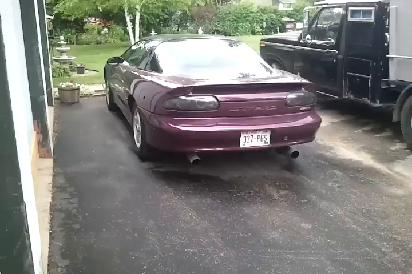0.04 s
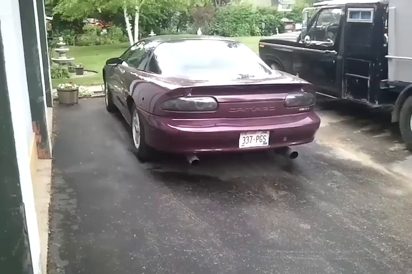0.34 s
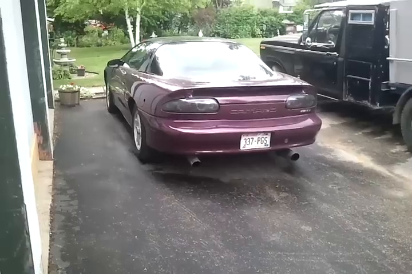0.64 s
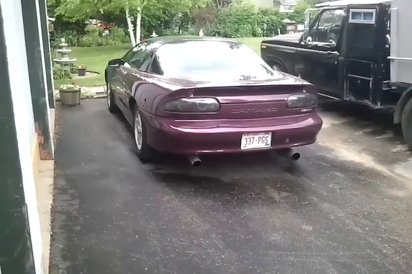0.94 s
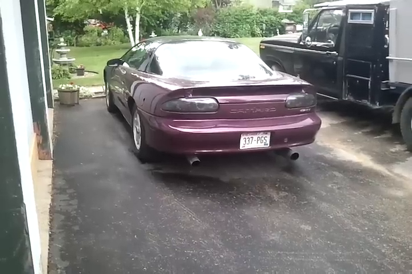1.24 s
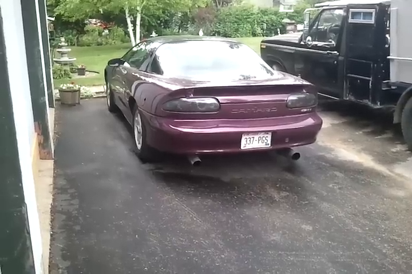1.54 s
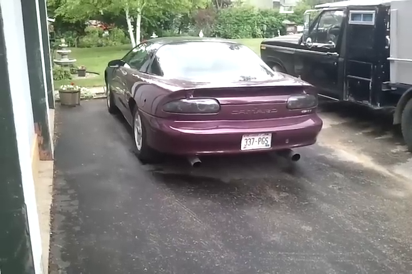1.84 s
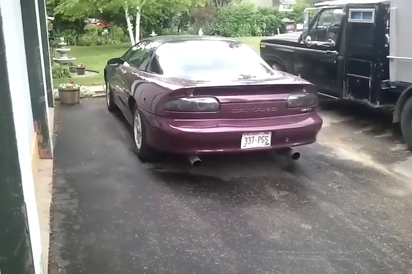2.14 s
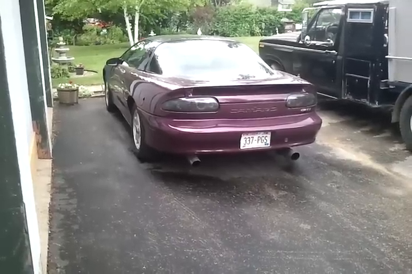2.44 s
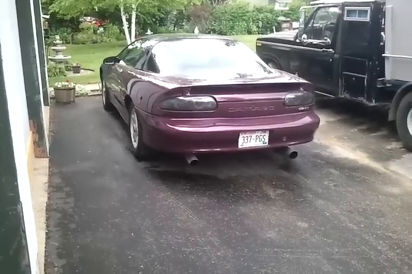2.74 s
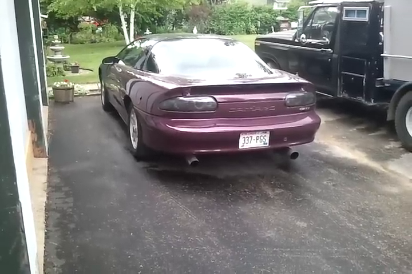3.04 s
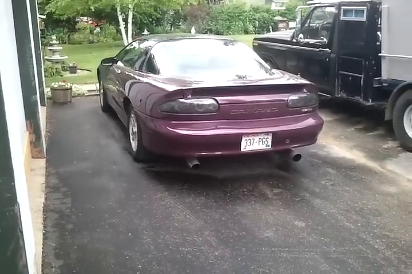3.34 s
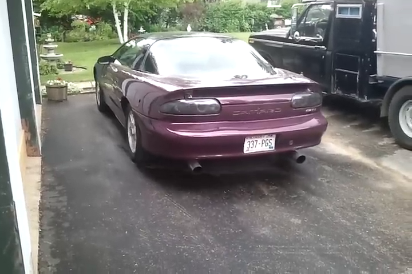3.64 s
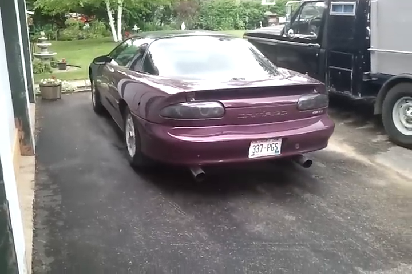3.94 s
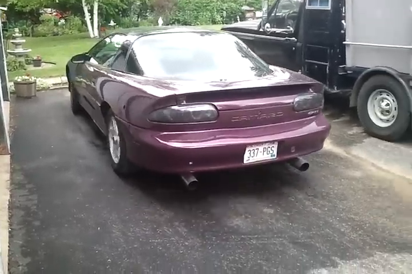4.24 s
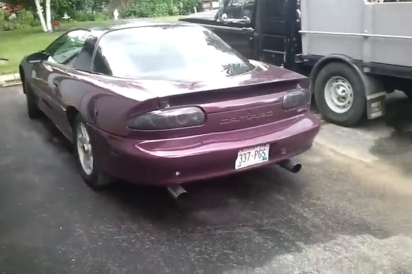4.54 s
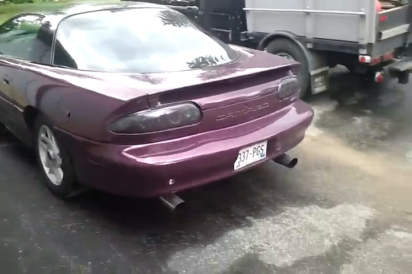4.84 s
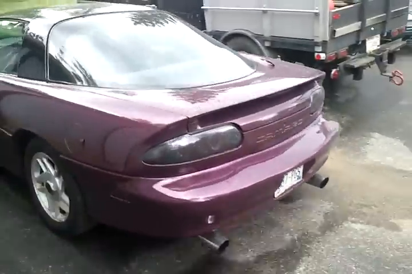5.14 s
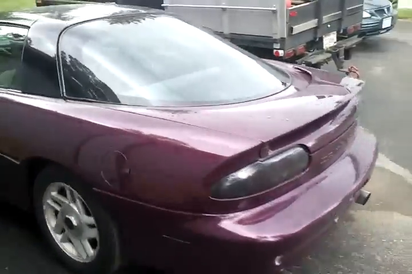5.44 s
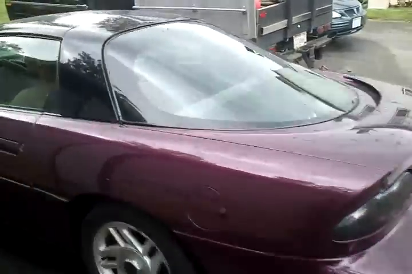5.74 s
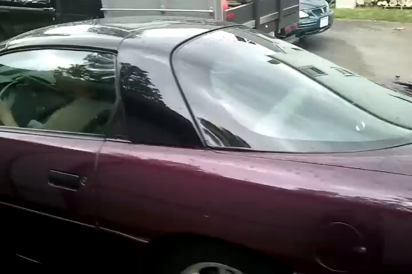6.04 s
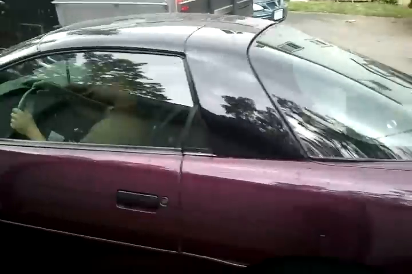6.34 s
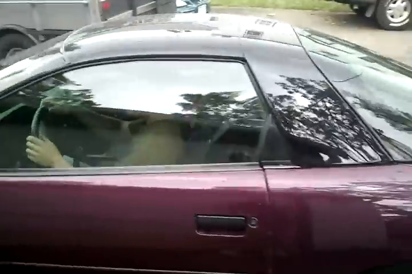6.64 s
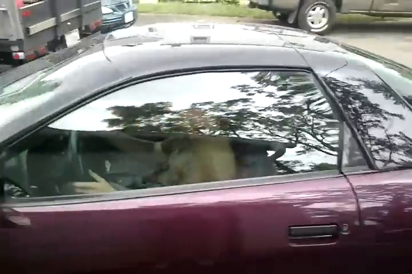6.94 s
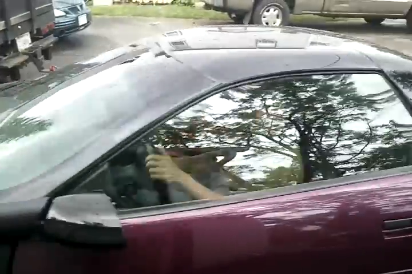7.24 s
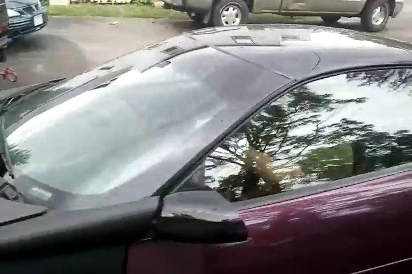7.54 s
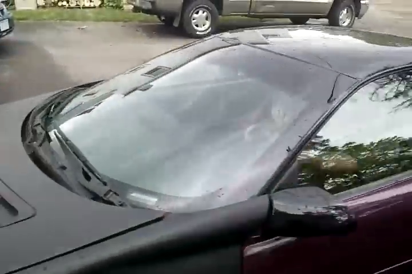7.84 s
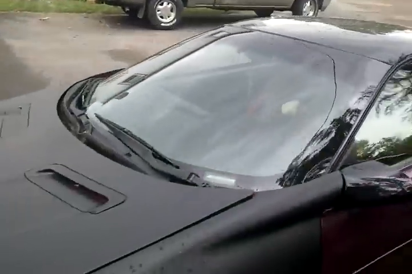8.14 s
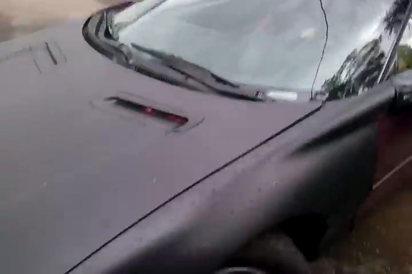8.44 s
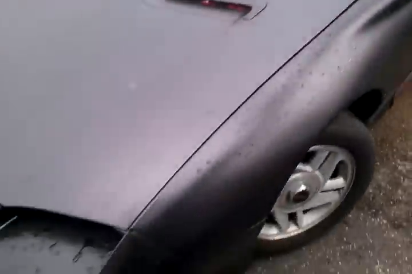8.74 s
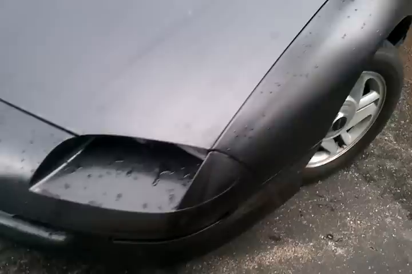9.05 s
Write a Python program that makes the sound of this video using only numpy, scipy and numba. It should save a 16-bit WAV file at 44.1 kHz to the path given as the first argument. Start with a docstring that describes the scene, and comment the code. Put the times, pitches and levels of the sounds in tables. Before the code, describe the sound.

Deep, uneven car exhaust idling, barking through three quick revs and a longer one, then settling as valve ticks and faint belt chirps emerge.

```python
"""A V8 coupe's loud exhaust lopes at idle in a driveway, heard from behind, then is revved four times.
Uneven firings boom in the mufflers, ring the pipes and shake a heat shield; each trails a puff of hiss.
The revs bark from the tailpipes and overload a small microphone.
The listener then walks past knocks and a clinking bracket to the bonnet,
where block growl, valve clatter and the hiss and chirps of the belt take over."""
import sys
import numpy as np
from scipy import signal
from scipy.fft import rfft, irfft
from scipy.io import wavfile
from scipy.ndimage import uniform_filter1d
from numba import njit

SR = 44100
rng = np.random.default_rng(int(sys.argv[2]) if len(sys.argv) > 2 else 0)


def inscribe(sig):
    """Save sig as 16-bit PCM at rate SR to the path in sys.argv[1].

    A 1-D sig is mono; a 2-D sig holds one channel per row.
    Samples are clipped to [-1, 1] before scaling.
    """
    pcm = np.round(np.clip(np.atleast_2d(sig).T, -1, 1) * 32767)
    wavfile.write(sys.argv[1], SR, pcm.astype(np.int16))


N = 410571
TIME = np.arange(N) / SR
FREQ = np.fft.rfftfreq(N, 1 / SR) + 1e-3
IDLE_HZ, IDLE_THROTTLE = 71.02, 0.17  # firing rate; opening, 0-1


# cylinders in firing order: strength_db, pipe_lag_ms
CYLINDERS = [(1, 2.3), (2, 3.3), (-0.5, 3.7), (-5.5, 0.72), (1, 2.9), (-4.5, 1.58), (1, 0.63), (-2.5, 4.2)]

def firings(hz, throttle, chug_db=1.5):
    """One pulse per cylinder in turn; the banks arrive unevenly and combustion is ragged at idle."""
    phase = np.cumsum(hz) / SR
    index = np.arange(int(phase[-1]))
    times = np.interp(index, phase, TIME)
    strength_db, lag_ms = np.array(CYLINDERS)[index % len(CYLINDERS)].T
    level_draw, time_draw = rng.standard_normal((len(index), 2)).T
    ragged = np.interp(times, TIME, idling(hz, throttle))
    scatter_db = np.interp(ragged, [0, 1], [1.6, 3.5]) * level_draw
    jitter_ms = np.interp(ragged, [0, 1], [0.2, 1.3]) * time_draw
    lope_db = chug_db * ragged * np.interp(times, TIME, wander(17))
    return clicks(times + (lag_ms + jitter_ms) / 1000, undb(strength_db + lope_db + scatter_db))


# accelerator presses: start_s, hold_s, depth, release_s
PRESSES = [(1.24, 0.09, 0.66, 0.13), (1.561, 0.072, 0.15, 0.11), (2.239, 0.17, 0.68, 0.1),
           (2.919, 0.12, 0.89, 0.13), (3.618, 0.8, 0.69, 0.28)]

def pedal(attack_s=0.076):
    """Each press opens the throttle quickly, holds it and lets it sink back to idle."""
    opening = np.zeros(N)
    for start, hold, depth, release in PRESSES:
        rise = np.clip((TIME - start) / attack_s, 0, 1)
        fall = np.exp(-np.maximum(TIME - start - hold, 0) / release)
        opening = np.maximum(opening, depth * rise * fall)
    return IDLE_THROTTLE + (1 - IDLE_THROTTLE) * opening


def idling(hz, throttle):
    """1 at idle speed and throttle, 0 once the engine runs smoothly."""
    return np.clip(1 - np.maximum(hz - IDLE_HZ, 0) / 10 - (throttle - IDLE_THROTTLE) / 0.2, 0, 1)


def pull(hz, lag_s=0.12, full_hz_per_s=130):
    """Engine load, 0-1: it pulls while the crank gains speed."""
    rise_hz_per_s = np.maximum(np.gradient(hz) * SR, 0)
    return np.tanh(fade(rise_hz_per_s, lag_s) / (lag_s * SR) / full_hz_per_s)


# pipe resonances under load: pitch_hz, width_hz, gain_db
GROWL_MODES = [(244, 20, -7), (278, 28, 11), (325, 15, 0.5)]
# exhaust level along the walk: time_s, rumble_db, drone_db
EXHAUST_LEVELS = [(0, -15, -12.5), (4.4, -8.5, -12.5), (4.85, -10, -13), (5.3, -13, -19.5),
                  (6.6, -13, -16.5), (7.6, -15, -21), (9.3, -13, -16.5)]

def exhaust(pulses, hz, throttle):
    """Firings and their turbulence flow through mufflers and pipes, which growl as the throttle opens."""
    rumble_db, drone_db = curves(EXHAUST_LEVELS)
    turbulence = unit(fade(pulses, 0.015) * noise())
    flow = unit(pulses) + (0.22 + 0.3 * idling(hz, throttle)) * turbulence
    growl = even(band(ring(flow, GROWL_MODES), 250, 360)) * (throttle - IDLE_THROTTLE) * undb(-13.5)
    mufflers = rumble(flow, hz, throttle) * undb(rumble_db)
    pipes = drone(flow, hz, throttle) * undb(drone_db)
    return mufflers + pipes + growl + chugs()


# muffler resonances: pitch_hz, width_hz, level_db
MUFFLER_MODES = [(46, 15.3, 1), (68.66, 15, -2)]

def rumble(flow, hz, throttle, lope_db=2):
    """The mufflers boom in turns, less when revved; the firing note fades as it leaves their resonance."""
    revving = uniform_filter1d(1 - idling(hz, throttle), size=4000)
    boom = np.zeros(N)
    for pitch, width, db in MUFFLER_MODES:
        mode = band(ring(flow, [(pitch, width, 0)]), 30, 98.3, order=3)
        boom += even(mode, size=6500) * undb(db + lope_db * wander(9))
    note = unit(np.sin(2 * np.pi * np.cumsum(hz) / SR + 0.66 * wander(12)))
    note_db = -7 - 0.11 * np.maximum(hz - IDLE_HZ, 0) + 2.5 * wander(8)
    return boom * undb(-1.5 - 2.5 * revving) + note * undb(note_db)


# pipe resonances: base_hz, width_hz, gain_db
PIPE_MODES = [(129.6, 30.3, -2), (156.1, 20.3, 5), (254.8, 64.7, -9.5), (311.9, 42.3, -13)]
# resonances under the floor pan: pitch_hz, width_hz, gain_db
UNDERBODY_MODES = [(126.4, 15, 2), (156.7, 49, -2), (220.2, 15.4, -5), (326.6, 21, -3.5)]

def drone(flow, hz, throttle, heat_s=0.59, waver_db=2):
    """Pipes drone louder and broader with flow, higher with heat and revs; alongside, the floor rings."""
    opening = throttle - IDLE_THROTTLE
    swell = np.tanh(np.maximum(hz - IDLE_HZ, 0) / 10 + opening / 0.52)
    heat = fade(opening, heat_s) / (heat_s * SR)
    tuning = (1 + 0.12 * heat) * (0.985 + 0.0014 * (hz - IDLE_HZ) + 0.02 * wander(8))
    damping = 0.9 + 0.15 * opening
    pipes = np.zeros(N)
    for base, width, db in PIPE_MODES:  # the pipes before and after the muffler ring alike
        front_pipe = resonate(flow, base * tuning, width * damping)
        pipes += undb(db) * resonate(front_pipe, base * tuning, width * damping)
    pipes = even(pipes, size=3200) * undb(8 * swell + 6 * throttle)
    floor = even(band(ring(flow, UNDERBODY_MODES), 86, 352), size=7000) * undb(1)
    beside = np.interp(TIME, [5.2, 6.1], [0, 1])
    return (np.sqrt(1 - beside) * pipes + np.sqrt(beside) * floor) * undb(waver_db * wander(14))


# heavy chugs of the lope: middle_s, length_s, pitch_hz, level_db
CHUGS = [(0.152, 0.24, 70, -8), (0.27, 0.12, 163, -6), (0.949, 0.23, 46, -6.5), (1.221, 0.22, 73, -9.5),
         (2.067, 0.26, 69.5, -7.5), (2.269, 0.22, 71.4, -1.5), (4.87, 0.47, 71.7, -7),
         (5.55, 0.18, 42.99, -10), (5.972, 0.24, 40, -7), (6.119, 0.18, 55.05, -4.5),
         (6.86, 0.26, 69.93, -10), (7.62, 0.14, 41.98, -19), (8.399, 0.24, 43, -10.5)]

def chugs(sag=0.08):
    """A chug swells one resonance for a few cycles, sagging in pitch as the crank slows again."""
    out = np.zeros(N)
    for middle, length, hz, db in CHUGS:
        along = np.clip((TIME - middle) / length, -0.5, 0.5)
        phase = hz * length * along * (1 - sag * along) + rng.random()
        out += undb(db) * np.cos(np.pi * along) ** 2 * np.sin(2 * np.pi * phase)
    return out


# tailpipe tip resonances: pitch_hz, width_hz, gain_db
TIP_MODES = [(600, 110, -4), (799, 26, 4), (924, 60, -1), (1700, 330, -12.5)]
# bark spectrum: frequency_hz, gain_db
BARK_SPECTRUM = [(250, -11), (320, -4), (400, -14), (520, -1.5), (800, 0.5), (1200, -5.5), (2200, -20.5),
                 (4000, -22.5)]

def tailpipes(pulses, hz, throttle):
    """Eddies behind each firing ring the tips and bark at open throttle, hardest while the engine pulls."""
    eddies = unit((0.17 + fade(pulses, 0.017)) * noise())
    tips = even(band(ring(eddies, TIP_MODES), 350, 3000)) * undb(-33 + 6 * throttle)
    bark = colour(eddies + 0.61 * unit(pulses), BARK_SPECTRUM)
    bark = even(bark + reverb(bark, t60_s=0.11))  # off garage wall, truck and tarmac
    bark *= throttle * undb(-22 + throttle + 5 * pull(hz))
    off_axis_db = np.interp(TIME, [4.8, 6], [0, -7])
    return (tips + bark) * undb(off_axis_db)


# exhaust gas spectrum: frequency_hz, gain_db
GAS_SPECTRUM = [(400, -22), (1300, -0.5), (1800, 6), (2600, 1), (3600, 2.5), (4600, 0), (6000, -3.5),
                (7200, -31.5)]

def gas_hiss(pulses, hz, throttle):
    """Hiss leaves the tailpipes, puffing after each firing and growing with throttle and speed."""
    hiss = even(colour(noise() * (2.1 + fade(pulses, 0.038)), GAS_SPECTRUM))
    level_db = -39 + 15 * throttle + 0.1 * (hz - IDLE_HZ) - 0.5 * wander(27)
    distance_db = np.interp(TIME, [5.5, 7], [0, -6])
    return hiss * undb(level_db + distance_db)


# heat shield resonances: pitch_hz, width_hz, gain_db
SHIELD_MODES = [(1760, 370, 1), (2450, 260, -3), (3220, 44, -1.5), (3600, 98, 4), (3970, 360, -6.5),
                (4320, 300, 1), (4740, 100, -2.5), (5580, 400, -7)]
# hard jolts of the shield: start_s, strength_db, decay_s
JOLTS = [(0.141, -27.5, 0.021), (0.224, -19, 0.016), (0.348, -20, 0.016), (0.452, -22.5, 0.024),
         (0.63, -26, 0.015), (0.707, -31, 0.018), (0.801, -26.5, 0.01), (0.919, -26.5, 0.014),
         (0.94, -19, 0.026), (1.054, -23, 0.018), (1.202, -23, 0.0076), (1.222, -18.5, 0.036),
         (1.251, -18.5, 0.013), (2.161, -21.5, 0.043), (2.258, -17, .025), (2.287, -19, 0.033),
         (2.865, -22, 0.076), (2.957, -16, 0.051), (3.534, -24, 0.033), (3.624, -20.5, 0.04),
         (4.456, -27.5, 0.03), (4.865, -21, 0.017), (5.434, -20, 0.012), (5.576, -16.5, 0.012),
         (5.71, -20, 0.027), (5.907, -20.5, .025), (6.116, -22, 0.027), (6.305, -23, 0.02),
         (6.484, -23, 0.023), (6.79, -25, 0.018), (6.906, -24.5, 0.013), (6.961, -26, 0.004),
         (7.331, -20.5, 0.036), (7.703, -21.5, 0.01), (8.129, -19.5, 0.027), (8.298, -17, 0.022),
         (8.499, -20, 0.029), (8.993, -16.5, 0.012)]

def heat_shield(hz, impacts_per_jolt=20, gap_s=0.0035, rise_s=0.0032, contact_s=0.0029):
    """Lumpy firings jolt the loose shield into fading chatter: lightly each cycle, now and then hard."""
    cycle = np.cumsum(hz) / SR / len(CYLINDERS)
    light_jolts = [(s, -36 + rng.standard_normal(), 0.037) for s in whole_turns(cycle)]
    start, db, decay = np.array(JOLTS + light_jolts).T[:, :, None]
    gaps = gap_s * (0.5 + rng.random((len(start), impacts_per_jolt)))
    age = np.cumsum(gaps, axis=1) - gaps[:, :1]
    envelope = np.exp(-age / decay) * (1 - 0.27 * np.exp(-age / rise_s))
    sizes = undb(db + rng.standard_normal(gaps.shape)) * envelope
    impacts = fade(clicks((start + age).ravel(), sizes.ravel()), contact_s) * noise()
    chatter = band(ring(impacts, SHIELD_MODES) + 0.21 * impacts, 1300, 6600)
    return unit(chatter) * np.std(impacts) * undb(-1.5)


# engine bay level along the walk: time_s, block_db, clatter_db
BAY_LEVELS = [(4.9, -28, -33), (5.6, -23.5, -34), (6.5, -21, -27), (7.3, -18.5, -26), (8.4, -19, -24),
              (9.3, -22, -25)]
# block growl spectrum: frequency_hz, gain_db
BLOCK_SPECTRUM = [(85, -19), (120, 13), (160, -6.5), (225, 2.5), (275, -3.5), (350, 2.5), (580, -2),
                  (700, -12), (950, -7.5), (1300, -9.5), (1600, -29), (3000, -37)]

def engine_bay(pulses, hz, tick_scatter_db=4):
    """The block growls with the firings; valves tick on the covers over the hiss of belts and intake."""
    block_db, clatter_db = curves(BAY_LEVELS)
    closings = whole_turns(2 * np.cumsum(hz) / SR)  # two valves per firing
    sizes = undb(tick_scatter_db * rng.standard_normal(len(closings)))
    ticks = fade(clicks(closings, sizes), 0.021)
    throb = fade(pulses, 0.031)
    block = even(colour(noise() * (0.14 + throb), BLOCK_SPECTRUM)) * undb(block_db - 1)
    clatter = (bay_hiss(ticks, throb) * undb(-2) + covers(ticks) * undb(-5)) * undb(clatter_db)
    body_shadow_db = np.interp(TIME, [4.4, 5.3], [-12, 0])
    return (block + clatter) * undb(body_shadow_db)


# belt and intake spectrum: frequency_hz, gain_db
HISS_SPECTRUM = [(600, -6), (1800, 2.5), (2600, 0.5), (3300, 2.5), (4400, 0), (5700, 1.5), (7200, -9)]
# reflection off the bodywork: time_s, delay_ms
BODY_ECHO = [(5, 1.2), (7.1, 1.55), (8.1, 1.85), (9.3, 1.4)]

def bay_hiss(ticks, throb):
    """Belts and intake hiss, pulsing with valves and firings and bouncing off the bodywork."""
    hiss = even(colour(noise() * (0.43 + 3.2 * ticks + 0.5 * throb), HISS_SPECTRUM))
    delay_ms, = curves(BODY_ECHO)
    return compartment(echo(hiss, delay_ms, share=0.45))


# engine cover and bracket resonances: pitch_hz, width_hz, gain_db
COVER_MODES = [(599, 16, 8.5), (1113, 19, 5), (1276, 34, 0), (3210, 43, 1), (3440, 180, -3),
               (3670, 160, -10), (5580, 91, -3)]

def covers(ticks):
    """Valve ticks ring the covers; each comes and goes as the listener moves."""
    taps = noise() * (0.03 + ticks)
    out = np.zeros(N)
    for pitch, width, db in COVER_MODES:
        mode = resonate(taps, pitch * (1 + 0.004 * wander(4)), np.full(N, float(width)))
        out += mode * undb(db + 3 * wander(4))
    return unit(out)


# belt and pulley chirps: start_s, end_s, first_hz, last_hz, width_hz, level_db
CHIRPS = [(7.15, 7.55, 1180, 1150, 40, -31), (7.78, 8.22, 1112, 1112, 7, -27),
          (7.25, 7.7, 5850, 5600, 220, -36), (7.4, 7.7, 3330, 3290, 40, -35),
          (7.7, 8.05, 3240, 3160, 30, -33), (8.05, 8.7, 3190, 3250, 25, -33),
          (8.1, 8.28, 4600, 4930, 50, -36), (8.39, 8.48, 6560, 6640, 160, -35),
          (8.46, 8.6, 4900, 5000, 70, -33), (8.5, 8.75, 3620, 3900, 200, -39),
          (8.15, 9.0, 4835, 4875, 40, -34), (8.55, 8.95, 5440, 5520, 30, -35),
          (8.78, 9.1, 5345, 5375, 22, -28.5), (8.9, 9.4, 3190, 3220, 30, -35)]

def belt_chirps(pulses):
    """Gliding chirps swell and die away, rasping as each firing tugs the belt."""
    out = np.zeros(N)
    for start, end, first_hz, last_hz, width, db in CHIRPS:
        during = (TIME > start) & (TIME < end)
        along = (TIME[during] - start) / (end - start)
        pitch = first_hz + (last_hz - first_hz) * along
        chirp = resonate(rng.standard_normal(len(along)), pitch, np.full(len(along), float(width)))
        out[during] += np.sin(np.pi * along) * undb(db) * unit(chirp)
    return out * even(0.35 + fade(pulses, 0.036))


# blows on the bracket: start_s, strength_db
CLINKS = [(6.484, -20.5), (6.781, -16.5), (7.063, -15.5), (7.591, -18), (7.64, -13)]
# bracket resonances: pitch_hz, width_hz, gain_db
BRACKET_MODES = [(1362, 42, 3.5), (3190, 40, 7.5), (3460, 51, 4), (3785, 69, 1), (4694, 110, -4),
                 (5280, 300, -8), (6400, 120, -4)]

def bracket(contact_s=0.0047, bounce_s=0.0094, bounce_db=-4):
    """A loose bracket is struck, bounces once and rings."""
    start, db = np.transpose(CLINKS)
    hits = clicks(start, undb(db)) + clicks(start + bounce_s, undb(db + bounce_db))
    blows = fade(hits, contact_s) * noise()
    return unit(band(ring(blows, BRACKET_MODES) + 0.13 * blows, 1000, 9300)) * np.std(blows)


# knocks on the way past: start_s, pitch_hz, level_db
KNOCKS = [(5.1, 1800, -26), (5.32, 1160, -24), (5.74, 2400, -31), (6.2, 1100, -28)]

def knocks(decay_s=0.039, width_hz=150):
    """Each dull metallic knock rings one broad resonance briefly."""
    out = np.zeros(N)
    for start, hz, db in KNOCKS:
        envelope = fade(clicks(np.array([start]), undb([db])), decay_s)
        out += envelope * unit(ring(noise(), [(hz, width_hz, 0)]))
    return out


# sharp ticks: start_s, level_db
CRACKLES = [(1.147, -20.5), (1.359, -13), (2.484, -20), (2.57, -31), (3.493, -24), (4.723, -23),
            (4.786, -32), (6.016, -25)]

def crackles(decay_s=0.005):
    """Single dry crackles, mostly as the microphone overloads."""
    start, db = np.transpose(CRACKLES)
    return unit(band(noise(), 700, 5500, order=1)) * fade(clicks(start, undb(db)), decay_s)


def compartment(x, wet=0.4, t60_s=0.04):
    """The space under the bonnet rings briefly; its peaks shift as the listener moves."""
    angle = np.pi * TIME / 2.4
    tail = np.cos(angle) * reverb(x, t60_s) + np.sin(angle) * reverb(x, t60_s)
    return (x + wet * tail) / np.hypot(1, wet)


def tarmac_echo(x, sway_ms=0.21):
    """The bounce off the tarmac shortens and sways as the listener walks, shifting the colour."""
    delay_ms = np.interp(TIME, [5, 9.3], [4.2, 2.39]) + sway_ms * wander(2)
    return echo(x, delay_ms, share=0.18)


def echo(x, delay_ms, share):
    """Add one reflection with a moving delay."""
    return (x + share * np.interp(TIME - delay_ms / 1000, TIME, x)) / np.hypot(1, share)


def reverb(x, t60_s, size=12000):
    """The scattered tail alone, at unit energy gain."""
    tail = rng.standard_normal(size) * np.exp(-np.log(1000) * TIME[:size] / t60_s)
    return signal.fftconvolve(x, tail / np.linalg.norm(tail))[:N]


def undb(db):
    """Decibels to gain."""
    return 10 ** (np.asarray(db) / 20)


def curves(table):
    """A timed table's columns at every sample."""
    times, *columns = np.transpose(table)
    return [np.interp(TIME, times, column) for column in columns]


def whole_turns(phase):
    """Times at which a phase, in cycles, completes each turn."""
    return np.interp(np.arange(1, int(phase[-1])), phase, TIME)


def unit(x):
    """Scale to rms 1."""
    return x / np.sqrt(np.mean(x ** 2))


def even(x, size=11000):
    """Scale to a running rms of 1, keeping the quick throb."""
    return x / np.sqrt(uniform_filter1d(uniform_filter1d(x ** 2, size), size // 2) + 1e-12)


def noise():
    """White noise."""
    return rng.standard_normal(N)


def wander(rate_hz):
    """Slow random drift with a spread near 1."""
    count = int(N / SR * rate_hz) + 2
    return 1.2 * np.interp(TIME * rate_hz, np.arange(count), rng.standard_normal(count))


def clicks(times, sizes):
    """One impulse at each time."""
    return np.bincount(np.clip(times * SR, 0, N).astype(int), sizes, N + 1)[:N]


def fade(x, decay_s):
    """Give each impulse an exponential tail."""
    return signal.lfilter([1], [1, -np.exp(-1 / (decay_s * SR))], x)


def band(x, lo_hz, hi_hz, order=2):
    """Band-pass."""
    return signal.sosfilt(signal.butter(order, [lo_hz, hi_hz], "band", fs=SR, output="sos"), x)


def colour(x, spectrum):
    """Filter by a spectrum, rolling off below its first point."""
    hz, db = np.transpose(spectrum)
    gain = undb(np.interp(np.log(FREQ), np.log(hz), db)) / (1 + (hz[0] / 2 / FREQ) ** 2)
    return irfft(rfft(x) * gain, N)


def ring(x, modes):
    """Pass through parallel resonances."""
    response = sum(undb(db) / (1 + 1j * (FREQ ** 2 - hz ** 2) / (FREQ * width)) for hz, width, db in modes)
    return irfft(rfft(x) * response, N)


@njit
def resonate(x, hz, width_hz):
    """State-variable band-pass with a moving centre and width."""
    y, band_state, low_state = np.empty(len(x)), 0., 0.
    for i in range(len(x)):
        g, damping = np.tan(np.pi * hz[i] / SR), width_hz[i] / hz[i]
        passed = (band_state + g * (x[i] - low_state)) / (1 + g * (g + damping))
        band_state = 2 * passed - band_state
        low_state += 2 * g * passed
        y[i] = damping * passed
    return y


# crank speed: time_s, firing_hz
CRANK_SPEED = [(0, 72.76), (0.9, 65.8), (1.27, 72.04), (1.42, 85.83), (1.58, 86.27), (2.0, 72.42),
               (2.17, 66.17), (2.28, 72.93), (2.42, 99.05), (2.53, 101.8), (2.86, 84.95), (3.09, 113.2),
               (3.4, 84.43), (3.6, 76.44), (3.95, 101.9), (4.15, 106), (4.42, 96.43), (4.9, 71.88),
               (5.12, 63.41), (5.4, 70.13), (6.1, 65.7), (7.1, 70.14), (8.4, 63.33), (9.3, 80.8)]

def scene():
    """One crankshaft, stumbling at idle, drives exhaust and engine bay."""
    hz, = curves(CRANK_SPEED)
    throttle = pedal()
    stumble = 1 + 0.025 * idling(hz, throttle) * wander(9)
    pulses = firings(hz * stumble, throttle)
    mix = exhaust(pulses, hz, throttle) + tailpipes(pulses, hz, throttle)
    mix += gas_hiss(pulses, hz, throttle) + heat_shield(hz) + crackles()
    mix += tarmac_echo(engine_bay(pulses, hz)) + belt_chirps(pulses)
    return (mix + knocks() + bracket())[None]


def record(dry, ceiling=0.79, knee=11, duck=0.27, threshold=0.3, top_hz=6750):
    """The microphone flattens the peaks, gain control eases off when it is loud, and the top is cut."""
    clipped = dry / (1 + np.abs(dry / ceiling) ** knee) ** (1 / knee)
    loudness = uniform_filter1d(np.abs(dry), size=2600)
    gain = np.maximum(loudness / threshold, 1) ** -duck
    return signal.sosfilt(signal.cheby1(10, 0.3, top_hz, fs=SR, output="sos"), clipped * gain)


dry = scene()
out = record(dry)
inscribe(out)
```